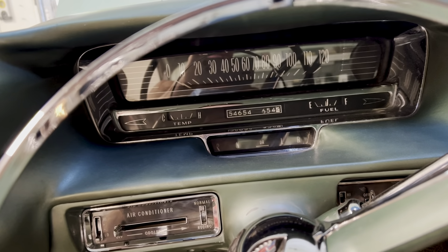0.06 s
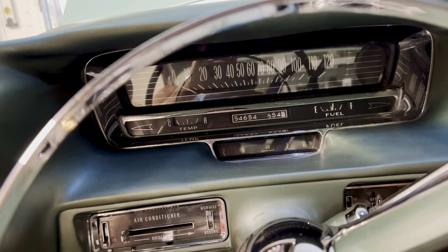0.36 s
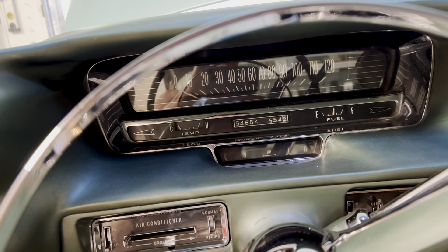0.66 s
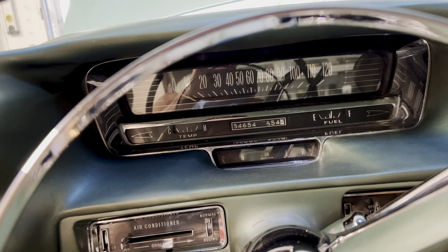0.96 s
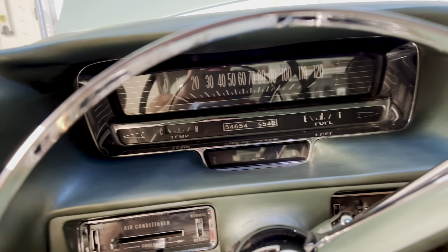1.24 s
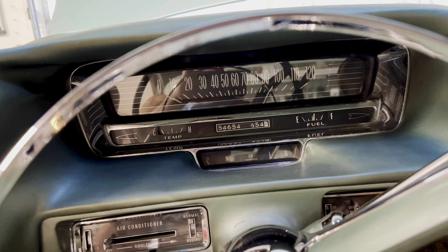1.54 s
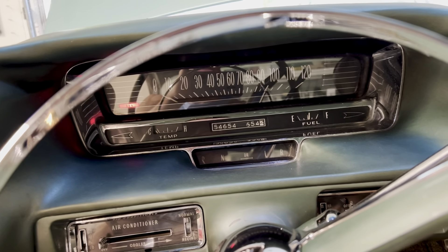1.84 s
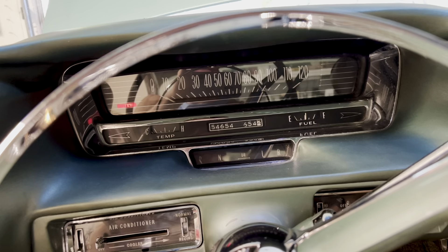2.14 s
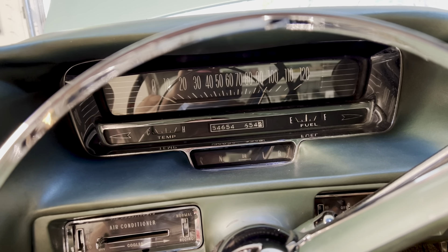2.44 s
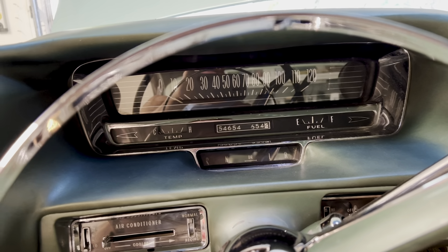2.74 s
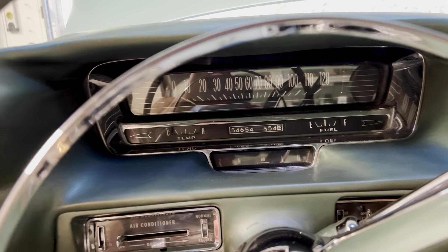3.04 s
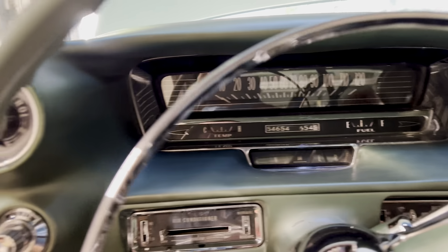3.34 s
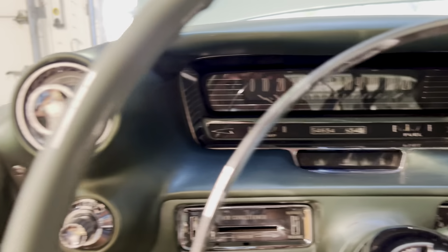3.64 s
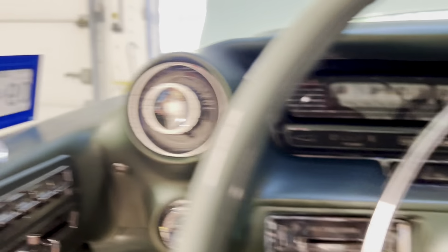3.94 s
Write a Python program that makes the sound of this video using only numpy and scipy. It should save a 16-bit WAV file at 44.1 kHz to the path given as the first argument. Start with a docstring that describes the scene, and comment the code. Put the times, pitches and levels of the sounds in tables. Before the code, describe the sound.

Inside an old car, the engine idles with a deep, uneven boom, then shuts off and chuffs to a stop. After a brief lull, a bunch of keys jingles near the microphone, with a few soft knocks.

```python
"""Switching off an old V8

From the driver's seat we hear the engine idle: its firings make the cabin boom and the exhaust ring.
Just before 2 s it is switched off and runs down with soft chuffs, while its belts whirr and squeak.
A bunch of keys ticks faintly at first. After 3 s the ignition lock snaps, and the keys jingle
against each other as they are pulled out, with a few soft knocks."""
import sys
import numpy as np
from scipy import signal
from scipy.fft import rfft, irfft
from scipy.io import wavfile
from scipy.ndimage import uniform_filter1d, minimum_filter1d

SR = 44100
rng = np.random.default_rng(int(sys.argv[2]) if len(sys.argv) > 2 else 0)


def int16_out(signal):
    """Quantize to a 16-bit WAV file."""
    q = np.round(np.clip(np.atleast_2d(signal).T, -1, 1) * 32767)
    wavfile.write(sys.argv[1], SR, q.astype(np.int16))


N = 176400
TIME = np.arange(N) / SR
FREQS = np.fft.rfftfreq(N, 1 / SR)

# engine speed as firings per second (t/s, rate/Hz)
FIRING_RATE = [(0, 57.6), (.4, 57.4), (.6, 58.6), (1.1, 58.5), (1.5, 57.3), (1.9, 57.4), (2.0, 49),
               (2.3, 33), (2.6, 14), (2.8, 0)]
START_FIRING = 5.35  # place in the firing order at 0 s
# the eight cylinders in firing order (level/dB, lateness/share of the gap between firings)
CYLINDERS = [(-3, .85), (-4.5, 0.684), (4, .75), (-7, 0.76), (-4, 0.41), (-4, 0.68), (-2, 0.43),
             (-2.5, .62)]
# cabin boom at the firing rate (t/s, level/dB)
BOOM_LEVEL = [(0, -7.5), (1.8, -6.5), (1.97, -6), (2.07, -15), (2.13, -12), (2.18, -20.5), (2.23, -14.5),
              (2.29, -12.5), (2.37, -20), (2.46, -22), (2.57, -23.5), (2.62, -36), (2.66, -33),
              (2.73, -33.5), (2.8, -54), (3, -81)]
# weaker tones beside the boom (vibrations per engine cycle, level/dB against the boom)
SIDE_ORDERS = [(5, -38.5), (12, -28)]
# the lope, a low tone that vibrates 11 times per engine cycle (t/s, level/dB)
LOPE_LEVEL = [(0, -18.5), (1.7, -16.5), (1.8, -16.5), (1.98, -26.5), (2.07, -17.5), (2.13, -22.5),
              (2.19, -28), (2.28, -31.5), (2.36, -42), (2.6, -45), (2.9, -57), (3.1, -91.5)]
# tone colour of the exhaust pipe and car body, heard inside (f/Hz, level/dB)
PIPE_COLOUR = [(60, -34.5), (95, -9), (120, 2), (145, -2.5), (165, -7.5), (182, -13), (200, -21.5),
               (222, -17.5), (242, -30.5), (285, -23), (305, -25.5), (345, -17.5), (390, -27), (450, -25.5),
               (560, -35.5), (900, -55.5), (2000, -88)]
# beat of the exhaust (t/s, level/dB)
EXHAUST_LEVEL = [(0, -27), (.7, -24), (1.4, -25), (1.8, -26.5), (1.98, -31.5), (2.12, -42), (2.2, -38.5),
                 (2.35, -48.5), (2.5, -80)]
# body notes that chug (f/Hz, level/dB against EXHAUST_LEVEL, place in the cycle/0-1, length/s)
CHUG_NOTES = [(164, 6.3, .39, .092), (145, -3, .92, .075), (220, -17, .71, .06), (284, -11, .68, .095)]

# clatter of the fan, belts and valves (t/s, level/dB)
CLATTER_LEVEL = [(0, -34), (1.5, -35), (1.85, -33.5), (2.0, -36), (2.15, -42.5), (2.3, -49), (2.45, -49.5),
                 (2.6, -59), (2.8, -82)]
# tone colour of that clatter (f/Hz, level/dB)
CLATTER_COLOUR = [(15, 0), (40, -4.5), (100, 5.5), (200, 4), (250, 0), (330, -2.5), (500, -8.5), (700, -10),
                  (1200, -11.5), (1500, -14.5), (2800, -17), (4000, -22.5), (5600, -24.5), (6700, -30.5),
                  (8000, -30), (9500, -38), (13000, -35), (16000, -38)]
# resonances of the engine bay (f/Hz, width/Hz, level/dB)
BAY_RINGS = [(2140, 110, -7), (2712, 170, -8.5), (3440, 210, -11.5)]
# hum of the engine bay (t/s, level/dB)
HUM_LEVEL = [(0, -50.5), (.22, -55.5), (.38, -55), (.8, -56), (1.0, -57), (1.2, -52), (1.3, -70),
             (1.45, -55), (1.56, -51.5), (1.72, -58.5), (1.9, -58.5), (2.15, -88)]
# tones in that hum (f/Hz, level/dB)
HUM_TONES = [(826, 1), (1093, -10), (1701, -6), (1809, -9)]
# belt whine that comes and goes (t/s, level/dB)
WHINE_LEVEL = [(0, -51), (.42, -71.5), (.55, -55), (.7, -51.5), (.86, -66), (.98, -55), (1.08, -69),
               (1.24, -57), (1.62, -60.5), (1.84, -50.5), (2.0, -66), (2.4, -96.5)]

# faint air noise in the cabin (t/s, level/dB)
AIR_LEVEL = [(0, -64.5), (2.9, -65), (3.1, -59), (3.3, -55.5), (3.55, -56), (3.72, -58.5), (4, -55)]
# tone colour of that air (f/Hz, level/dB)
AIR_COLOUR = [(25, -5), (60, 7.5), (150, 3.5), (300, -11), (600, -10), (1200, -15), (3000, -24),
              (8000, -33), (16000, -45.5)]
# low cabin rumble, heard once the engine is still (t/s, level/dB)
RUMBLE_LEVEL = [(2.6, -72.5), (2.8, -53.5), (2.94, -51), (3.0, -40.5), (3.14, -49), (3.21, -52),
                (3.26, -44.5), (3.42, -42), (3.52, -44.5), (3.6, -56), (3.74, -40.5), (3.8, -52.5),
                (3.92, -46), (4, -48)]

# clear strikes of key on key (t/s, level/dB)
KEY_HITS = [(.024, -27), (.047, -37), (.091, -38.5), (.124, -38), (.183, -34.5), (.269, -27), (.277, -28),
            (.317, -40), (.355, -35), (.4, -34), (3.103, -38), (3.113, -29.5), (3.186, -34), (3.196, -27),
            (3.266, -25.5), (3.33, -24.5), (3.345, -23), (3.366, -30), (3.379, -29), (3.386, -17.5),
            (3.41, -29), (3.432, -27), (3.532, -15), (3.544, -19.5), (3.601, -19), (3.64, -30),
            (3.692, -36), (3.748, -28.5), (3.756, -18), (3.764, -26.5), (3.808, -28.5), (3.896, -31),
            (3.934, -34)]
# keys sliding over each other (t/s, level/dB)
KEY_RUSTLE = [(0, -72), (.28, -49.5), (.45, -69), (.6, -87.5), (3.08, -88.5), (3.17, -62.5), (3.22, -43),
              (3.3, -43.5), (3.38, -34), (3.44, -49), (3.47, -48), (3.5, -43.5), (3.52, -59), (3.56, -41),
              (3.64, -40), (3.68, -55.5), (3.72, -62), (3.82, -60), (3.86, -62), (4, -61)]
# notes the keys ring at (f/Hz, level/dB, t60/s); t60 is the time to fade by 60 dB
KEY_MODES = [(4400, -18, .1), (5190, -15.5, 0.13), (6300, -20.5, 0.13), (6790, -16, .13), (7700, -12, 0.16),
             (8010, -9, 0.15), (8600, -10.5, .15), (11540, 3, 0.04), (12000, 3, 0.13), (13300, -2, .07),
             (13590, -3, 0.096), (14110, 0.5, 0.098), (14700, -1.5, .12)]
# tone colour of a key's scrape (f/Hz, level/dB)
SCRAPE_COLOUR = [(500, -29), (2500, -23.5), (5000, -21), (8000, -11), (9500, -12), (11700, 1.5),
                 (13000, -1.5), (15500, 3.5), (16500, 1)]
# how freely the keys ring, most while they swing loose (t/s, level/dB against the scrape)
KEY_RING_LEVEL = [(3.28, -14), (3.335, -8), (3.4, -12), (3.52, -20.5)]

# body panels humming as the engine rocks to rest (t/s, level/dB)
PANEL_LEVEL = [(1.7, -60), (1.95, -42.5), (2.2, -59), (2.5, -49), (2.7, -60), (2.95, -66), (3.2, -81)]
# resonances of those panels (f/Hz, width/Hz, level/dB)
PANEL_RINGS = [(172, 18, 4), (221, 21, -6.5), (270, 11, -7), (339, 5.6, 0), (388, 20, -6.5), (402, 5, -9)]
# chuffs of air in the engine's last turns (t/s, level/dB)
CHUFFS = [(2.031, -31), (2.078, -25.5), (2.199, -35), (2.27, -37), (2.4, -30), (2.469, -34), (2.576, -38.5),
          (2.625, -48), (2.69, -47.5), (2.8, -49)]
# belts rubbing as they slow (t/s, level/dB)
WHIRR_LEVEL = [(1.9, -66.5), (2.15, -58), (2.38, -56.5), (2.47, -69), (2.6, -100)]
# resonances of the rubbing belts (f/Hz, width/Hz, level/dB)
WHIRR_RINGS = [(1970, 66, -7.5), (2090, 36, 3.5), (3240, 57, -5.5), (5780, 410, -15.5), (7800, 720, -10.5),
               (13000, 720, -7)]
# thin whistle that rises as the engine slows (t/s, f/Hz, level/dB)
WHISTLE = [(1.95, 5650, -91), (2.14, 5700, -71.5), (2.29, 5770, -65), (2.34, 5820, -69), (2.42, 6060, -66),
           (2.55, 6070, -105)]
# squeaks in the belt's last turn (t/s, level/dB)
SQUEAKS = [(2.45, -52.5), (2.497, -64), (2.565, -69)]

# notes the ignition lock rings at (f/Hz, level/dB, t60/s)
LOCK_MODES = [(649, -58, .1), (1295, -41, 0.06), (1390, -44.5, 0.062)]
# knocks of the lock and trim (t/s, clack level/dB, thump level/dB)
KNOCKS = [(3.226, -40, -50), (3.247, -53, -47), (3.274, -54, -44), (3.356, -48, -51), (3.474, -53, -53),
          (3.502, -52, -52), (3.805, -46.5, -41.5), (3.827, -47, -43), (3.928, -66, -41), (3.961, -74, -51),
          (3.989, -57, -54)]
# resonances of the clack (f/Hz, width/Hz, level/dB)
CLACK_RINGS = [(657, 71, 11), (1000, 180, 4), (1350, 170, 5.5), (2240, 1200, -4), (3500, 14000, -14)]
# resonances of the thump (f/Hz, width/Hz, level/dB)
THUMP_RINGS = [(124, 56, 5.5), (216, 40, 11.5), (300, 34, -1.5)]

# how alike noise is at the two ears (f/Hz, likeness/0-1)
EAR_LIKENESS = [(50, 0.83), (130, 1), (260, .35), (500, 0), (1000, 0), (4000, 0), (16000, 0.36)]
# how much louder the left side is than the right (f/Hz, level/dB)
LEFT_BIAS = [(50, .4), (90, .5), (140, 1.4), (250, 3.5), (500, 2.7), (1000, 3.3), (2000, 4.8), (4500, 4.8),
             (8000, 0), (16000, 0)]
# tone colour of the microphones (f/Hz, level/dB)
MIC_COLOUR = [(18, 16), (36, 0), (8800, 0), (9400, 0), (9900, -14), (10300, -10), (10800, -11.5),
              (11400, 1), (16000, -5)]


def amp(db):
    """Turns decibels into a gain to multiply by."""
    return 10 ** (np.asarray(db) / 20)


def unit(x):
    """Scales a signal to an average strength (rms) of 1."""
    return x / np.sqrt(np.mean(x ** 2) + 1e-20)


def curve(points):
    """Joins a table's points in time with straight lines, one value per sample."""
    return np.interp(TIME, *np.transpose(points))


def across(points, hz):
    """Reads a table at the given frequencies, with octaves evenly spaced."""
    f, value = np.transpose(points)
    return np.interp(np.log(hz + 1), np.log(f), value)


def add(mix, s, sound):
    """Mixes a sound in, starting at s seconds."""
    part = mix[..., max(round(s * SR), 0):][..., :sound.shape[-1]]
    part += sound[..., :part.shape[-1]]


def fade(t, t60, attack_s=0):
    """Dies away by 60 dB in t60 seconds, with an optional quick rise at the start."""
    rise = np.minimum(t / attack_s, 1) if attack_s else 1
    return rise * np.exp(-np.log(1000) * t / t60)


def drift(hz):
    """A smooth random wobble of strength 1; a higher hz makes it faster."""
    return unit(irfft(rfft(rng.standard_normal(N)) * np.exp(-(FREQS / hz) ** 2), N))


def rings(table):
    """A filter made of resonances: narrow bands where an object likes to vibrate."""
    return sum(amp(db) * 1j * FREQS * width / (hz ** 2 - FREQS ** 2 + 1j * FREQS * width)
               for hz, width, db in table)


def muffled(response, top_hz=458):
    """Takes the highs out of a filter."""
    return response / (1 + (FREQS / top_hz) ** 4)


def ringing_filter(colour):
    """A filter of the given colour that rings only after it is struck (minimum phase)."""
    cepstrum = irfft(np.log(amp(across(colour, FREQS))), N)
    forward_only = np.r_[1, np.full(N // 2 - 1, 2), np.zeros(N // 2)]
    return np.exp(rfft(cepstrum * forward_only))


def noise(response):
    """Filtered stereo noise, most alike at the two ears in the bass."""
    a, b = rfft(rng.standard_normal((2, N)))
    likeness = across(EAR_LIKENESS, FREQS)
    mid, side = a * np.sqrt(1 + likeness), b * np.sqrt(1 - likeness)
    return unit(irfft(np.array([mid + side, mid - side]) * response, N))


def wavering(hz, waver=.009, rate_hz=22, flutter_db=2.5, flutter_hz=22):
    """A tone whose pitch wanders and whose level flutters separately at each ear."""
    phase = 2 * np.pi * np.cumsum(hz * (1 + waver * drift(rate_hz))) / SR
    ears = [np.sin(phase + drift(flutter_hz) / 2) * amp(flutter_db * drift(flutter_hz))
            for _ in range(2)]
    return np.sqrt(2) * np.array(ears)


def boom():
    """Low tones follow the engine's speed; after switch-off the cabin rings on at its own pitches."""
    cycle_hz = curve(FIRING_RATE) / len(CYLINDERS)  # in one cycle every cylinder fires once
    start = START_FIRING / len(CYLINDERS)
    coasting = np.clip((TIME - 1.9) / .08, 0, 1)  # 0 while running, 1 once switched off

    def tone(order, rest_hz=0):
        hz = order * cycle_hz * (1 - coasting) + rest_hz * coasting
        return np.sqrt(2) * np.cos(2 * np.pi * (order * start + np.cumsum(hz) / SR))
    sides = sum(amp(db) * tone(order) for order, db in SIDE_ORDERS) * (1 - coasting)
    main = (tone(order=8, rest_hz=51.8) + sides) * amp(curve(BOOM_LEVEL) + .2 * drift(12))
    lope = tone(order=11, rest_hz=83.3) * amp(curve(LOPE_LEVEL) + .7 * drift(10))
    return main + lope


def exhaust(firings, scatter_db=1.3, jitter_s=.00015):
    """Each cylinder sends out an uneven puff that rings the pipe and the body."""
    firing_samples = np.flatnonzero(np.diff(np.floor(firings)))
    puffs, rate = np.zeros(N), curve(FIRING_RATE)
    for i in firing_samples:
        db, lateness = CYLINDERS[int(firings[i + 1]) % len(CYLINDERS)]
        size, jitter = rng.standard_normal(2)
        delay_s = lateness / max(rate[i], 1) + jitter_s * jitter
        add(puffs, i / SR + delay_s, amp([db + scatter_db * size]))
    beat = irfft(rfft(puffs) * ringing_filter(PIPE_COLOUR), N)
    return beat / np.std(beat[:N // 2]) * amp(curve(EXHAUST_LEVEL) - 6)


def chug(firings, scatter_db=1.4, jitter_s=.0004):
    """The uneven firing order swells each of the body's notes once per engine cycle."""
    out, cycles = np.zeros(N), firings / len(CYLINDERS)
    for hz, db, place, length in CHUG_NOTES:
        t = TIME[:round(length * SR)] - length / 2
        swell = np.cos(np.pi * t / length) ** 2 * np.cos(2 * np.pi * hz * t)
        peak_times = np.flatnonzero(np.diff(np.floor(cycles - place))) / SR
        for s in peak_times[peak_times > length / 2]:
            size, jitter = rng.standard_normal(2)
            add(out, s - length / 2 + jitter_s * jitter, amp(db + scatter_db * size) * swell)
    return out * amp(curve(EXHAUST_LEVEL))


def engine_bay(firings):
    """Fan and valve noise pulses twice per firing, beside a wavering hum and the belt's whine."""
    hiss = noise(amp(across(CLATTER_COLOUR, FREQS))) + amp(-15.5) * noise(rings(BAY_RINGS))
    pulse = (1 + .065 * np.cos(4 * np.pi * firings)) * amp(.5 * drift(50))
    hum = sum(amp(db) * wavering(hz) for hz, db in HUM_TONES) * amp(curve(HUM_LEVEL))
    whine = wavering(hz=2156) * amp(curve(WHINE_LEVEL))
    turning = np.minimum(curve(FIRING_RATE), 1)
    return hiss * pulse * amp(curve(CLATTER_LEVEL)) + (hum + whine) * turning


def background(rumble_hz=58.6, wander_hz=5.5):
    """Faint air noise fills the cabin, and later its lowest note rumbles softly."""
    pitch = rumble_hz + wander_hz * drift(11)
    tone = np.sqrt(2) * np.sin(2 * np.pi * np.cumsum(pitch) / SR)
    rumble = tone * amp(curve(RUMBLE_LEVEL) + 2.1 * drift(6.1))
    air = noise(amp(across(AIR_COLOUR, FREQS))) * amp(curve(AIR_LEVEL))
    return rumble + air


def key_clink(ring_db, detune_hz=220, scatter_db=4, attack_s=.0003, size=8000):
    """Two keys touch: a sharp tick, a bright scrape and a random mix of their ringing notes."""
    t, freqs = TIME[:size], np.fft.rfftfreq(size, 1 / SR)
    hiss = unit(irfft(rfft(rng.standard_normal(size)) * amp(across(SCRAPE_COLOUR, freqs)), size))
    tick = hiss * amp(7) * fade(t, t60=.003)
    scrape = hiss * fade(t, t60=.022)
    ring = np.zeros(size)
    for hz, db, t60 in KEY_MODES:
        strength, detune, start = rng.standard_normal(3)
        note = np.sin(2 * np.pi * ((hz + detune_hz * detune) * t + start))
        ring += amp(db + scatter_db * strength) * note * fade(t, t60)
    ring *= amp(ring_db) / np.std(ring[:size // 20])
    return (tick + scrape + ring) * np.minimum(t / attack_s, 1)


def keys(clink_kinds=16, touches_per_s=420, spread_db=3.5, left_delay_s=.00016):
    """Keys strike clearly over a shower of small touches, a little nearer the right ear."""
    strikes, shower = np.zeros(N), np.zeros(N)
    for _ in range(clink_kinds):
        touches = rng.random(N) < touches_per_s / clink_kinds / SR
        strengths = amp(spread_db * np.minimum(rng.exponential(1, N), 3))
        shower += signal.oaconvolve(touches * strengths, key_clink(ring_db=-17.5))[:N]
    for s, db in KEY_HITS:
        ring_db = np.interp(s, *np.transpose(KEY_RING_LEVEL))
        add(strikes, s, amp(db - 6.5) * key_clink(ring_db))
    bunch = strikes + unit(shower) * amp(curve(KEY_RUSTLE))
    return np.array([np.roll(bunch, round(left_delay_s * SR)), bunch])


def cabin_echoes(sound, echo_db=-3.5, size=8000):
    """Adds short, dense echoes from the glass and dashboard."""
    tail = rng.standard_normal((2, size)) * fade(TIME[:size], t60=.053, attack_s=.003)
    tail /= np.linalg.norm(tail[0])
    return sound + amp(echo_db) * signal.oaconvolve(sound, tail, axes=1)[:, :N]


def run_down(chuff_hz=127.7, chuff_s=.097, sag=.16):
    """With no spark, each push of air only swells the pipe's low, sagging note; the panels hum along."""
    chuffs = np.zeros(N)
    progress = np.linspace(0, 1, round(chuff_s * SR))
    pitch = chuff_hz * (1 + sag * (.5 - progress))
    swell = np.sin(np.pi * progress ** .71) ** 2
    for s, db in CHUFFS:
        turns = rng.random() + np.cumsum(pitch) / SR
        add(chuffs, s, amp(db) * swell * np.sin(2 * np.pi * turns))
    chuffs *= amp(2 * drift(45))
    panels = noise(muffled(rings(PANEL_RINGS))) * amp(curve(PANEL_LEVEL))
    return chuffs + panels


def belts(squeak_hz=2890):
    """The slowing belts rub with a whirr, whistle and finally squeak."""
    times, hz, db = np.transpose(WHISTLE)
    whistle = wavering(np.interp(TIME, times, hz), waver=.03, rate_hz=450)
    whistle *= amp(np.interp(TIME, times, db))
    slips, t = np.zeros(N), TIME[:SR // 2]
    for s, slip_db in SQUEAKS:
        add(slips, s, amp(slip_db) * fade(t, t60=.18, attack_s=.01))
    squeak = slips * np.sin(2 * np.pi * np.cumsum(squeak_hz + 14 * drift(110)) / SR)
    whirr = noise(rings(WHIRR_RINGS)) * amp(curve(WHIRR_LEVEL))
    return whirr + whistle + squeak


def lock(snap_s=3.226):
    """The lock snaps as the key is turned back, and its barrel gives a hollow ring."""
    out, t = np.zeros(N), TIME[:SR // 2]
    for hz, db, t60 in LOCK_MODES:
        add(out, snap_s, amp(db) * np.sin(2 * np.pi * hz * t) * fade(t, t60, attack_s=.0015))
    return out


def knocks():
    """Each knock on the lock or trim is a short clack with a slower, duller thump."""
    clack, thump, t = np.zeros(N), np.zeros(N), TIME[:SR // 2]
    for s, clack_db, thump_db in KNOCKS:
        add(clack, s, amp(clack_db) * fade(t, t60=.087, attack_s=.00062))
        add(thump, s, amp(thump_db) * fade(t, t60=.17, attack_s=.012))
    clack_colour = sum(amp(db) * abs(rings([(hz, width, 0)])) ** 2 for hz, width, db in CLACK_RINGS)
    return clack * noise(clack_colour) + thump * noise(muffled(rings(THUMP_RINGS)))


def scene():
    """The engine, keys and knocks together inside the car."""
    firings = START_FIRING + np.cumsum(curve(FIRING_RATE)) / SR  # running count
    engine = boom() + exhaust(firings) + chug(firings) + run_down() + engine_bay(firings) + belts()
    return engine + cabin_echoes(keys()) + lock() + knocks() + background()


def record(dry, ceiling=.9, limiter_samples=1500, top_hz=15950):
    """Microphones lift the deep bass, notch the treble and favour the left; loud peaks are eased down."""
    colour = amp(across(MIC_COLOUR, FREQS) + np.array([[.5], [-.5]]) * across(LEFT_BIAS, FREQS))
    mic_filter = np.roll(irfft(colour, N), 1024, axis=1)[:, :2049] * np.hanning(2049)
    heard = signal.oaconvolve(dry, mic_filter, "same", axes=1)
    safe_gain = np.minimum(ceiling / (abs(heard).max(0) + 1e-9), 1)
    heard *= uniform_filter1d(minimum_filter1d(safe_gain, limiter_samples), limiter_samples)
    treble_cut = signal.firwin(511, top_hz, window=("kaiser", 9), fs=SR)
    return signal.oaconvolve(heard, treble_cut[None], "same")


dry = scene()
out = record(dry)
int16_out(out)
```